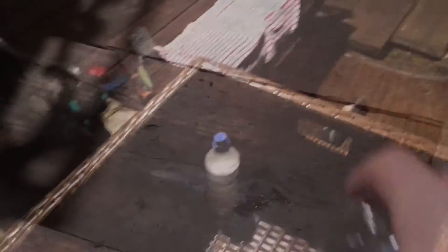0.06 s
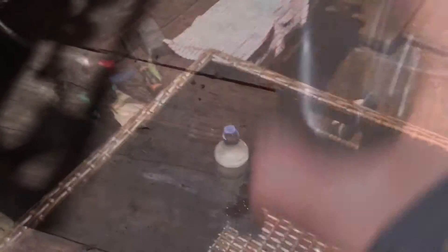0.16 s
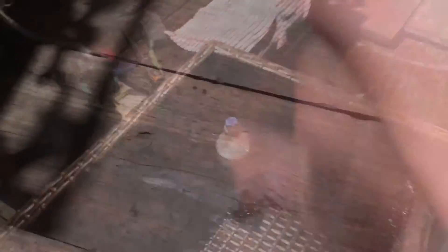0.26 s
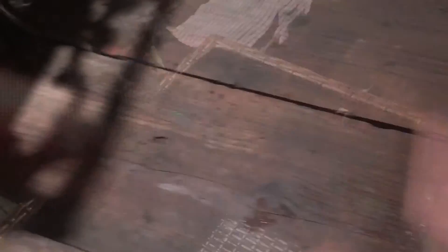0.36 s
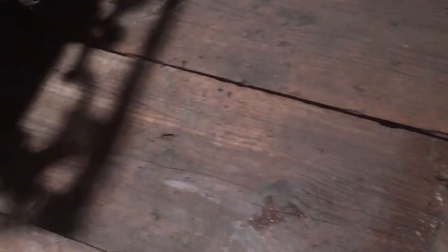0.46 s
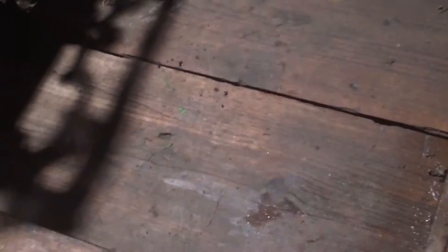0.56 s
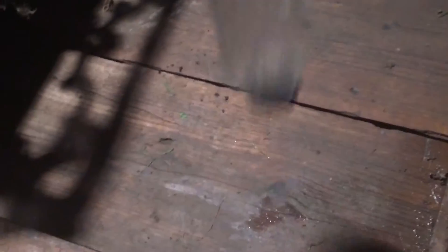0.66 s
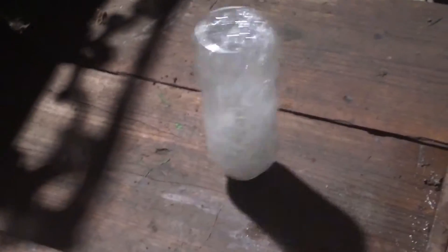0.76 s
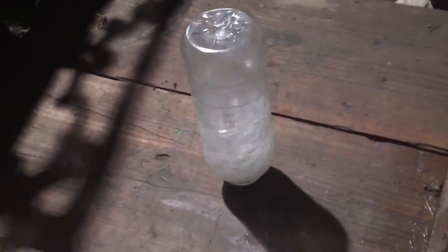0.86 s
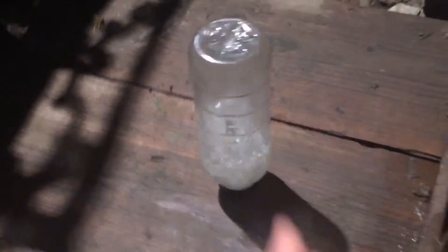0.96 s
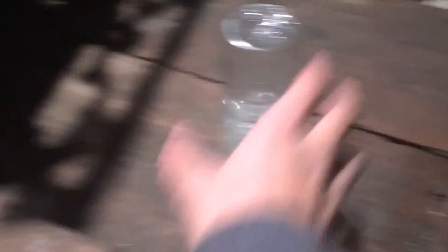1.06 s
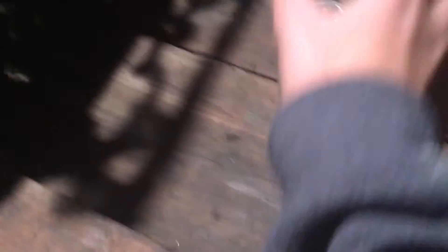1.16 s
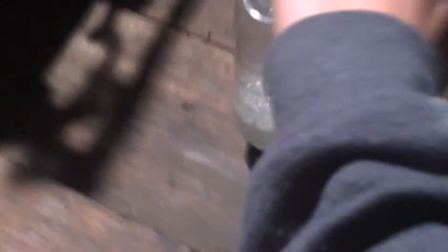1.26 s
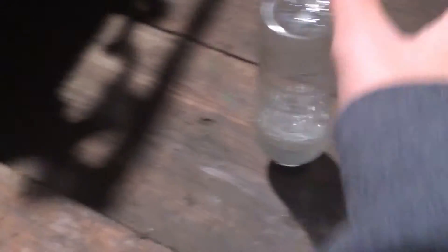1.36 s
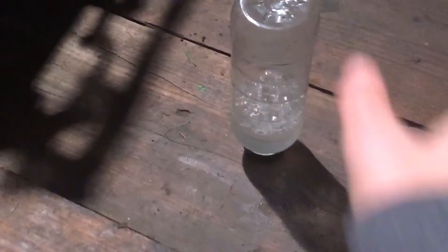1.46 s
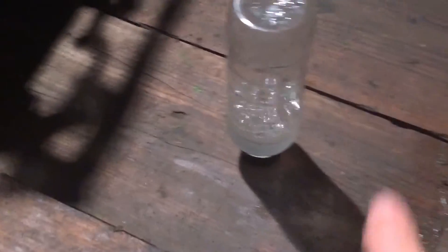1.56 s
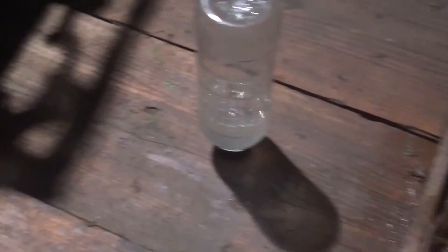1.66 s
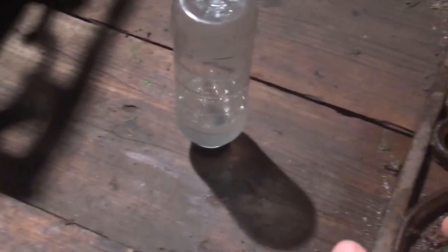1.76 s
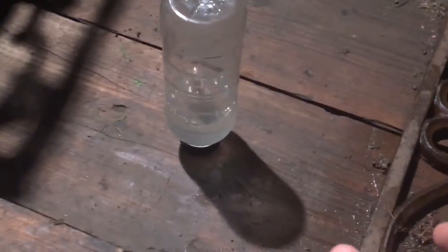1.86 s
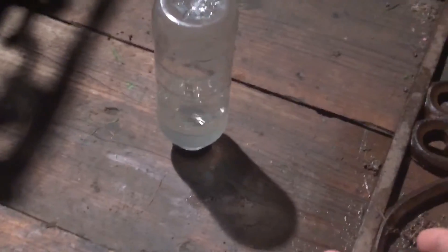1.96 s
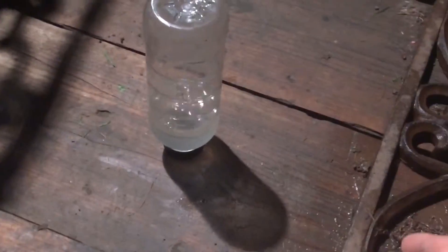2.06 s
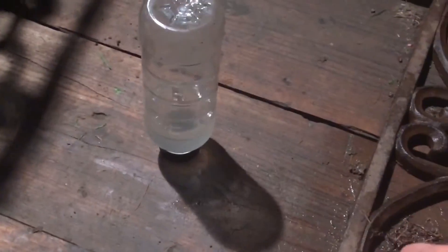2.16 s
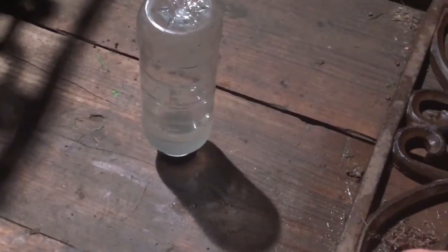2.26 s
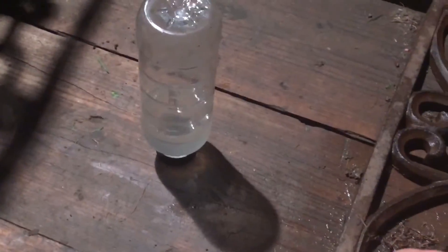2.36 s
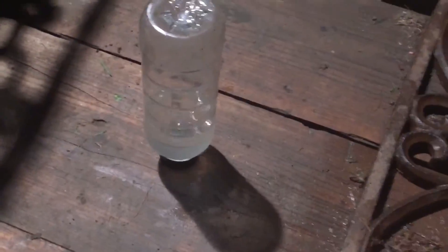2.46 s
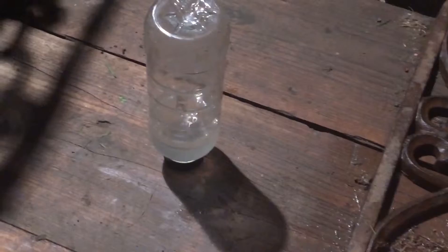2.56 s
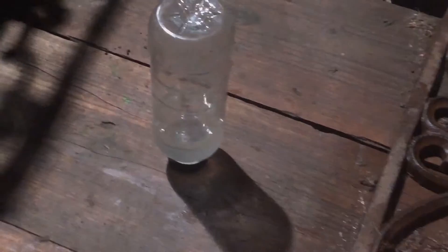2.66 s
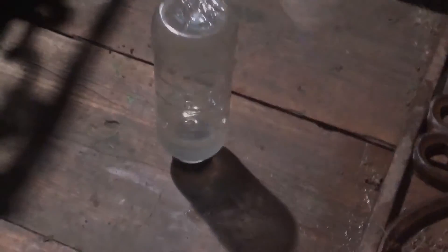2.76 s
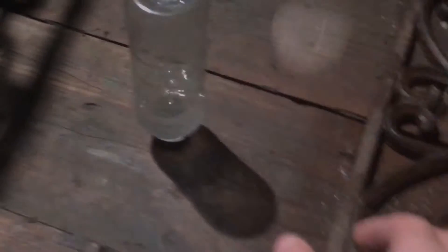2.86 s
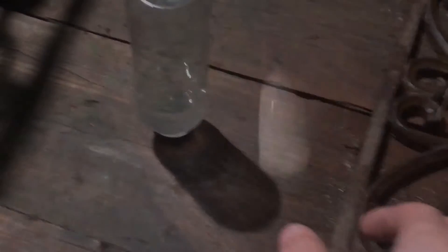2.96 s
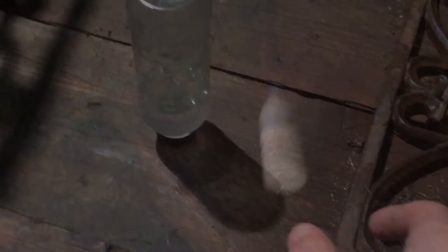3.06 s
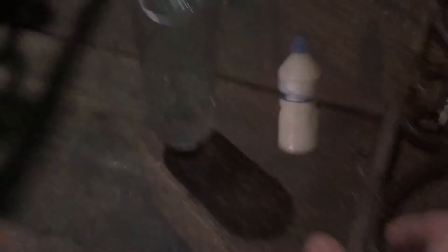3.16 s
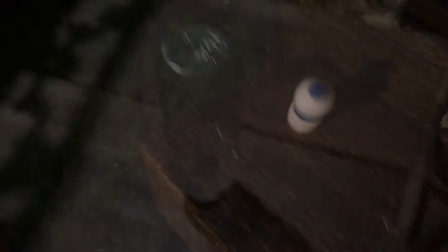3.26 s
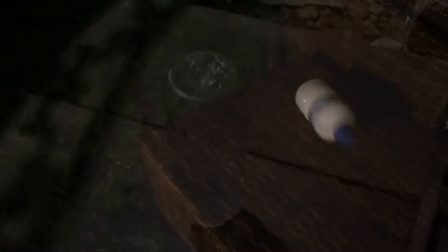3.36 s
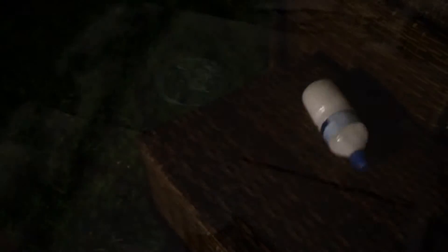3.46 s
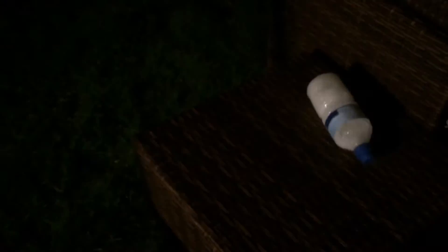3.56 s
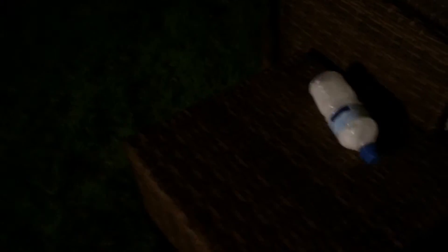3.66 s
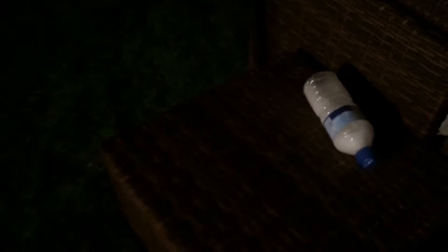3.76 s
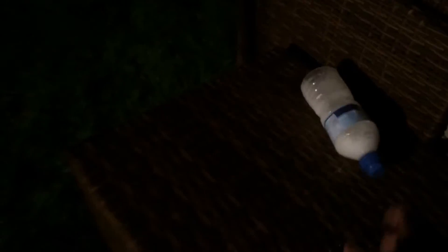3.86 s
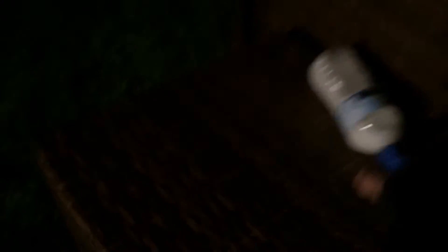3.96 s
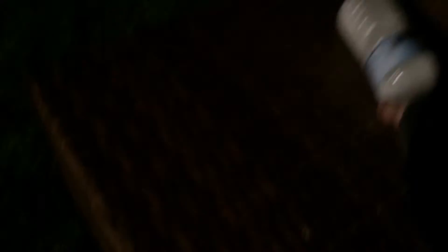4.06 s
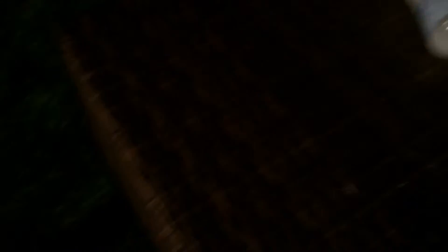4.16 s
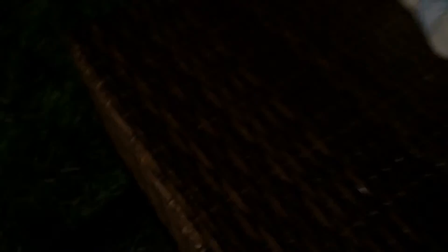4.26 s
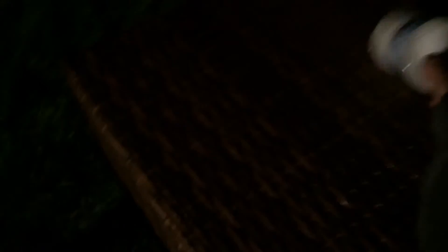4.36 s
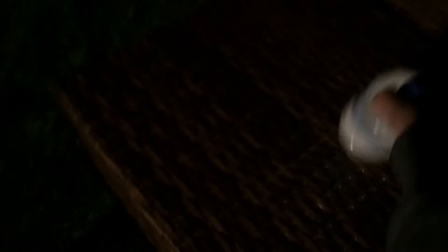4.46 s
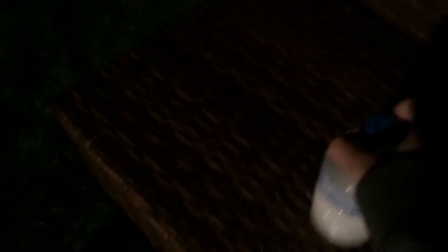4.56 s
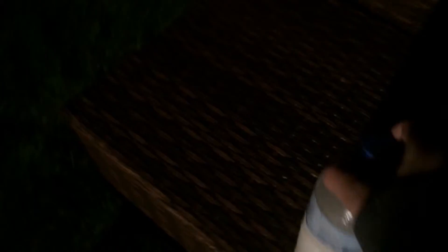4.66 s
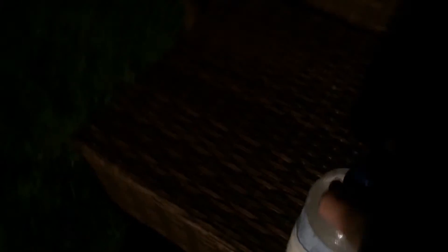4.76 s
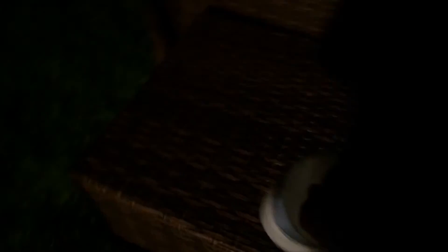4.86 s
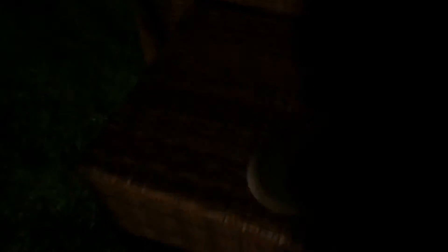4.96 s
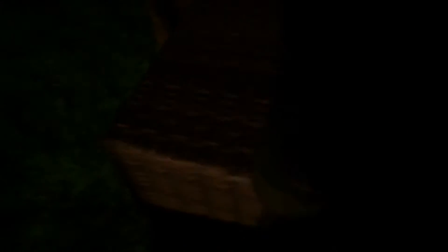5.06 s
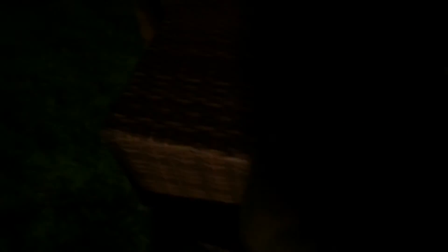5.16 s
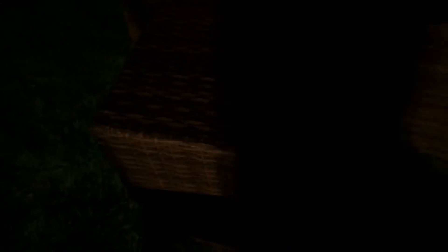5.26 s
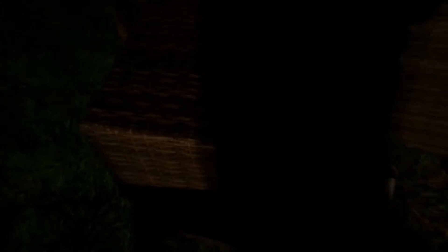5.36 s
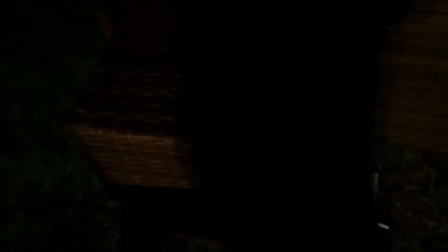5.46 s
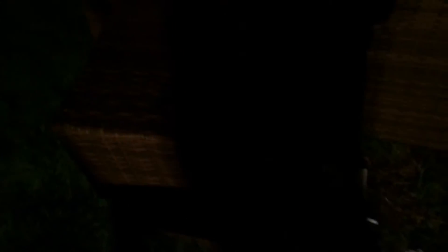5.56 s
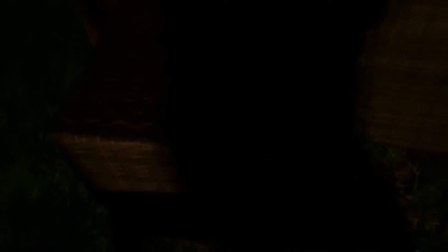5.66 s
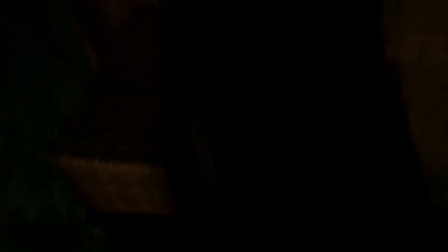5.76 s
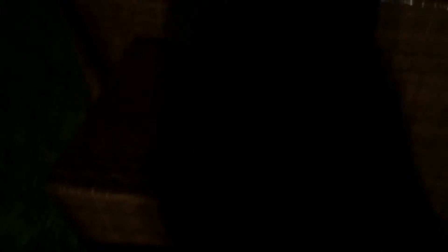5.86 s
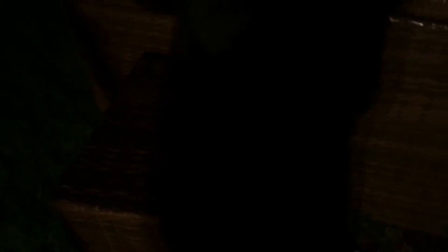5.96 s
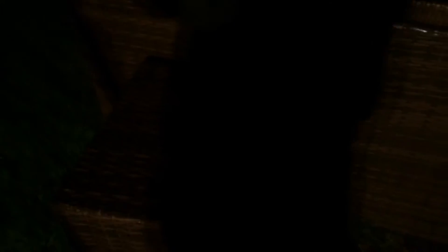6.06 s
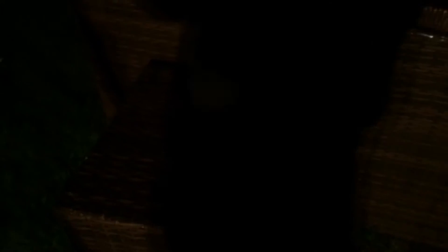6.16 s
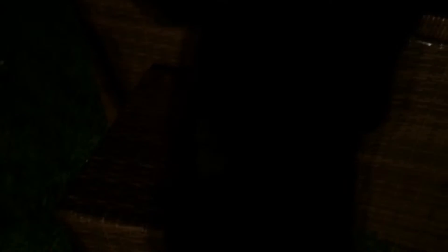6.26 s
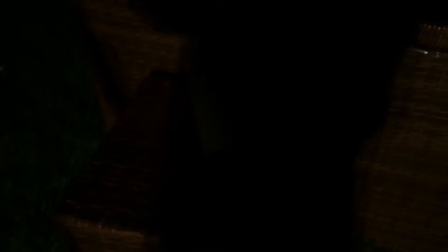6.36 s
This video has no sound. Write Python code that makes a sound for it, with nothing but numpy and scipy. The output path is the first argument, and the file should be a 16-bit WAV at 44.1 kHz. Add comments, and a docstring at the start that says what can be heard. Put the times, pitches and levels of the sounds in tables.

```python
"""Bottle flips on a night porch

Water sloshes in a spinning plastic bottle, which lands hard on a wooden deck: struck modes and cracks of noise.
A second bottle hits a wicker table, topples, is picked up and lands there again: the weave thuds and crackles.
Plastic clicks, bubbles ring as rising tones, a sleeve rustles as filtered noise, and feet shift on the boards.
Behind them are distant traffic made of noise and a faint wavering hum, all close to a phone."""
import sys
import numpy as np
from scipy import signal
from scipy.fft import rfft, irfft
from scipy.io import wavfile
from scipy.ndimage import uniform_filter1d, minimum_filter1d

SR = 44100
rng = np.random.default_rng(int(sys.argv[2]) if len(sys.argv) > 2 else 0)


def generate_wav(signal):
    """Clip the signal to [-1, 1] and save it as 16-bit WAV at the path in sys.argv[1]."""
    frames = np.transpose(np.atleast_2d(signal))
    scaled = np.clip(frames, -1, 1) * 32767
    pcm = np.round(scaled).astype(np.int16)
    wavfile.write(sys.argv[1], SR, pcm)


N = 282240  # samples, 6.4 s
AGE = np.arange(SR // 2) / SR  # seconds since a blow

# blows of the bottle on the deck, before the overall deck level:
# start_s, boards_db, contact_s (time constant of the push), crack_db (thin shell)
DECK_BLOWS = [(0.7978, -48, 0.00014, -37.5), (0.8102, -24, 0.00044, -41.5), (0.8215, -6, 0.000034, -8),
              (0.8238, -13.5, 0.00026, -16), (0.8387, -21, 0.00051, -23), (0.8442, -7, 0.00063, -13),
              (0.8474, -18, 0.0002, -19.5)]
# ringing of the boards and the standing bottle: pitch_hz, level_db, t60_s (time to fade by 60 dB)
DECK_MODES = [(234, -8, .16), (262, -11, .18), (313, -18, .18), (364, -13, .14), (436, -10.5, .13),
              (524, -14, .12), (706, -17, .09), (748, -20, .09), (834, -20, .07), (927, -14, .055),
              (1107, -19, .07), (1690, -15, .04), (1835, -2, .018), (2100, -13, .025), (2520, -9, .015),
              (2900, -13, .018)]
# tone of the cracking shell: pitch_hz, relative_level_db (per Hz)
SHELL = [(90, -31.5), (350, -9.5), (600, -8.5), (1140, -19.5), (1340, -18), (2130, -12), (2800, -15.5),
         (3400, -22), (9890, -33), (15500, -42.5)]
DECK_DB = 2.5  # overall deck level: the nearest sound


def deck_landing():
    """The rim touches, the base slams down and rocks; each blow rings the boards and cracks the thin shell."""
    blows, cracks = np.zeros(N), np.zeros(N)
    for start_s, boards_db, contact_s, crack_db in DECK_BLOWS:
        push = fade(contact_s * np.log(1000))  # a longer contact is duller
        add(blows, start_s, undb(boards_db) * push / push.sum())
        crack = hiss(0.014) + undb(-9.0) * hiss(0.087)
        add(cracks, start_s, undb(crack_db) * crack)
    boards = sum(undb(db) * ring(hz, t60) for hz, db, t60 in DECK_MODES)
    knock = signal.fftconvolve(blows, boards)[:N]
    knock = band(knock, 140, 7500, order=3)  # open planks radiate little deep bass
    landing = knock + colour(cracks, SHELL)
    return undb(DECK_DB) * porch(landing, wet_db=-30.5, t60=0.38, top_hz=2507)


# weight of a bottle sinking into the wicker: start_s, level_db, lowest_pitch_hz, base_t60_s
WICKER_THUDS = [(3.0890, -16, 140, 0.2), (3.1040, -34, 168, 0.16), (3.1120, -17.5, 61, 0.2),
                (3.5085, -22.5, 114, 0.036), (6.0830, -30.5, 146.3, 0.1), (6.3365, -22.5, 137, 0.073),
                (6.3480, -11.5, 186, 0.028), (6.3560, -2.5, 79, 0.097), (6.3640, -2.5, 123, 0.063)]
# table under that weight: pitch_multiple (of the lowest), level_db, t60_share (of the base)
WICKER_MODES = [(1.002, 3.5, 0.63), (1.36, -2.5, 0.91), (1.952, -8, 0.63)]
# plastic slapping the strands: start_s, crackle_db, crackle_t60_s, snap_extra_db (above crackle_db)
WICKER_SLAPS = [(3.0871, -19.5, 0.017, -9), (3.0924, -22, 0.13, -1), (3.1065, -25.5, 0.031, -1),
                (3.1118, -17, 0.091, 0), (3.1211, -29, 0.046, 6.5), (3.3367, -43, 0.044, -5),
                (6.0805, -39.5, 0.093, 6), (6.332, -27, 0.12, -8), (6.353, -20.5, 0.072, -26),
                (6.357, -24, 0.16, 5.5), (6.3634, -18, 0.05, 1), (6.374, -19, 0.045, -1.5)]
# thin bottle under a slap: pitch_hz (before the dent shifts it), level_db, t60_s
BOTTLE_MODES = [(1380, -10, 0.017), (1820, -8.5, 0.022), (2885, -1, 0.019), (4610, -12, 0.015)]
# tone of the woven strands: pitch_hz, relative_level_db (per Hz)
WEAVE = [(200, -6), (420, -4.5), (620, -2.5), (820, -10), (1150, -8), (2790, -8.5), (3900, -14.5),
         (5200, -14), (13500, -18.5), (15500, -30)]


def wicker_landings():
    """Each slap snaps and rings the bottle; strands slip in a dense crackle while the table takes the weight."""
    slips, snaps, bottle = np.zeros(N), np.zeros(N), np.zeros(N)
    for start_s, crackle_db, t60, snap_extra_db in WICKER_SLAPS:
        snap_db = crackle_db + snap_extra_db
        add(slips, start_s, undb(crackle_db) * hiss(t60))
        add(snaps, start_s, undb([snap_db]))  # a single-sample click
        dent = np.exp(0.067 * rng.standard_normal())  # the dent shifts the pitch
        shell = sum(undb(db) * ring(hz * dent, life) for hz, db, life in BOTTLE_MODES)
        add(bottle, start_s, undb(snap_db) * shell)
    crackle = slips * unit(undb(3.3 * walk(1800)))
    strands = colour(crackle + 7 * snaps, WEAVE)
    table = thuds(WICKER_THUDS, WICKER_MODES, rise_t60=0.0092)
    return porch(strands + bottle + table, wet_db=-24.5, t60=0.25, top_hz=4100)


# bottle rolling and dragging over the strands: start_s, length_s, end_level_db, growth_db (on the way)
ROLLS = [(3.337, 0.068, -44, 1.5), (3.494, .064, -48, -5), (3.599, 0.071, -56.5, 0.5),
         (4.303, .19, -54.5, 6.5)]
ROLL_GRAINS_PER_S, ROLL_SCATTER_DB = 600, 3.8


def rolling():
    """The ribs of the bottle catch strand after strand: a rough rattle of short, uneven scrapes."""
    unevenness = unit(undb(ROLL_SCATTER_DB * walk(ROLL_GRAINS_PER_S)))
    grains = rng.standard_normal(N) * unevenness
    level = sum(stroke(*row, attack_s=0.001, release_s=0.014) for row in ROLLS)
    return colour(grains * level, WEAVE)


# full bottle bumping as it is gripped and lifted: start_s, level_db, lowest_pitch_hz, base_t60_s
KNOCKS = [(4.4335, -37, 162, 0.059), (4.4505, -41, 140, 0.19), (4.4665, -38.5, 212.6, 0.13),
          (5.0485, -32, 178, 0.037), (5.0542, -30.5, 185, 0.14)]
# bottle in the hand: pitch_multiple (of the lowest), level_db, t60_share (of the base)
KNOCK_MODES = [(1, 5, 0.84), (2, -6, 0.85), (4.43, -11, 0.32), (7.6, -28, 0.38)]
# clicks and crinkles of the plastic: start_s, level_db, centre_hz
CRINKLES = [(0.4342, -38.5, 8200), (0.536, -40, 8550), (1.0482, -54, 6650), (2.7246, -55.5, 7740),
            (2.82, -54.5, 6360), (3.3707, -20, 8200), (3.3887, -35, 5430), (3.4032, -33, 6500),
            (3.5044, -32, 8400), (3.5302, -24.5, 8260), (4.2149, -30.5, 700), (4.2190, -21.5, 3500),
            (4.387, -40, 3330), (4.4815, -42, 2590), (5.0542, -33, 1100), (5.068, -42.5, 4600),
            (5.1580, -41, 6700), (5.187, -51.5, 6440), (5.2628, -55, 9540), (5.4366, -44, 6900),
            (5.9912, -54.5, 6560)]
CRINKLE_T60_S = 0.0017  # fade time of a buckle at 0 dB
CRINKLE_HALVING_DB = 8.5  # this much harder a buckle fades in half the time


def handling():
    """The thin plastic buckles with a sharp click and a brief ring; the filled body knocks and scuffs."""
    out = thuds(KNOCKS, KNOCK_MODES, rise_t60=0.0044) + undb(3.5) * scuffs(KNOCKS)
    for start_s, db, centre_hz in CRINKLES:
        buckle = hiss(CRINKLE_T60_S * 2 ** (-db / CRINKLE_HALVING_DB))
        buckle[0] = 8  # the snap that starts it
        click = band(buckle, centre_hz / 2.05, centre_hz * 1.34, order=1)
        add(out, start_s, undb(db) * (click + undb(-8.5) * ring(centre_hz, 0.014)))
    return porch(out, wet_db=-28.0, t60=0.3, top_hz=4900)


# water thrown about in the bottle: start_s, level_db, length_s (a third of its t60), centre_hz
SPLASHES = [(0.547, -24, 0.016, 4250), (0.5734, -30.5, 0.039, 5500), (0.854, -17.5, 0.088, 380),
            (0.878, -38, 0.13, 2100)]
# single bubbles: start_s, level_db, starting_pitch_hz, cycles (t60 counted in cycles of that pitch)
BUBBLES = [(.5490, -27.5, 526, 36), (0.598, -20, 6700, 25), (0.603, -21.5, 1786, 32),
           (0.6738, -23, 3190, 12), (2.581, -38.5, 1660, 62), (6.191, -42, 502, 114)]
# swarms of bubbles in churned water: start_s, length_s, first_level_db (for the largest size),
# lowest_hz, highest_hz
GURGLES = [(0.56, 0.11, -33, 2900, 9000), (0.875, 0.12, -25, 140, 536), (0.868, .085, -32, 1590, 2960)]
GURGLE_CYCLES, GURGLE_FALL_DB = 16, -8  # life of a bubble; level change from first to last


def slosh():
    """Water breaks into spray and traps bubbles: single ones, and swarms that weaken towards their end."""
    spray, bubbles = np.zeros(N), np.zeros(N)
    for start_s, db, length_s, centre_hz in SPLASHES:
        splash = band(hiss(3 * length_s), centre_hz / 1.4, centre_hz * 1.3, order=1)
        add(spray, start_s, undb(db) * splash * (1 - fade(0.00825)))
    for start_s, db, hz, cycles in BUBBLES:
        add(bubbles, start_s, undb(db) * bubble(hz, cycles))
    for start_s, length_s, first_db, low_hz, high_hz in GURGLES:
        for when, pitch, size in rng.random(size=(30, 3)):  # 30 bubbles a swarm, each value 0 to 1
            hz = low_hz * (high_hz / low_hz) ** pitch
            gain = size * undb(first_db + GURGLE_FALL_DB * when)
            add(bubbles, start_s + when * length_s, gain * bubble(hz, GURGLE_CYCLES))
    water = spray * undb(3.6 * walk(900)) + bubbles
    return porch(water, wet_db=-14.5, t60=0.053, top_hz=6945)


def bubble(hz, cycles):
    """A trapped bubble rises slightly in pitch as it rings."""
    life = cycles / hz
    rising = 1 + 0.038 * AGE / life
    return np.sin(2 * np.pi * hz * AGE * rising) * fade(life) * (1 - fade(life / 2))


# feet and knees on the deck: start_s, level_db, lowest_pitch_hz (of the boards), base_t60_s
STEPS = [(0.558, -14.5, 59.4, 0.049), (2.845, -23, 161, 0.035), (4.47, -39, 68, 0.2),
         (5.569, -34.5, 62.4, 0.14), (5.949, -24, 155.3, 0.041)]


def feet():
    """Each footfall bends the boards and grinds a little grit under the sole."""
    # modes: pitch multiple, dB, share of the t60
    boards = thuds(STEPS, [(1, -0.5, 0.85), (2.05, -8, 0.83)], rise_t60=0.051)
    return porch(boards + undb(-5.5) * scuffs(STEPS), wet_db=-12.0, t60=0.25, top_hz=2953)


# strokes of the arm in its sleeve: start_s, length_s, end_level_db, growth_db (during the stroke)
STROKES = [(0.244, 0.15, -48, 19.5), (0.455, 0.21, -64.5, -4.5), (1.096, 0.33, -69, -1.5),
           (1.453, 0.24, -64.5, 12), (2.627, 0.35, -80, -9), (3.12, 0.45, -60, 9), (3.92, 0.31, -65, 0.5),
           (4.256, 0.25, -61.5, -1.5), (4.506, 0.43, -71, -4.5), (4.974, 0.18, -58, 6.5),
           (5.176, 0.25, -53, 17), (5.886, 0.16, -73, -7)]
STROKE_ATTACK_S, STROKE_RELEASE_S = 0.02, 0.025  # time constants of cloth taking up and losing speed
REACH_S, REACH_WIDTH_S, REACH_DB = 4.014, 0.16, -63  # long reach for the fallen bottle
# tone of the cloth: pitch_hz, relative_level_db (per Hz)
CLOTH = [(1300, -23.5), (2400, -5.5), (5200, -5.5), (12000, -7.5), (15500, -12.5)]


def sleeve():
    """Fibres catch and let go as the arm moves, a few with a tick; the long reach gives a narrower swish."""
    ticks = (rng.random(N) < 40 / SR) * rng.standard_normal(N)  # about 40 a second
    catching = unit(undb(2.5 * walk(1000) + walk(37)))
    fibres = rng.standard_normal(N) * catching + undb(17) * ticks
    swish = unit(band(rng.standard_normal(N), 1870, 4500))
    swish = swish * undb(REACH_DB) * swell(REACH_S, REACH_WIDTH_S)
    return colour(fibres, CLOTH) * sum(stroke(*row) for row in STROKES) + swish


# far cars going by: nearest_s, level_db (there), half_power_s (time until the power has halved)
CARS = [(0.271, -57, 0.2), (3.052, -56, 0.34), (5.7, -63, 1)]
# tone of the far tyres: pitch_hz, relative_level_db (per Hz)
ROAR = [(250, -35.5), (420, -21), (860, -7.5), (1040, -5.5), (1190, -8.5), (1500, -12.5), (2900, -27.5),
        (15500, -56.5)]
# tone of the low rumble: pitch_hz, relative_level_db (per Hz)
RUMBLE = [(20, 3), (65, 1.5), (190, -2), (320, -8.5), (600, -15), (1200, -61.5)]
TOWN_DB, RUMBLE_OVER_ROAR_DB = -62.5, 4.5  # steady traffic behind the cars; rumble against the roar
# swells of a far engine's hum: loudest_s, level_db, spread_s (of the bell shape)
HUM_SWELLS = [(3.419, -49, 0.33), (4.62, -58.5, 0.3), (5.72, -53, 0.24)]
HUM_HZ = 145  # the pitch it wavers around
HISS_DB = -73.5  # steady treble hiss of the microphone


def night():
    """Far tyres and low rumble grow as each car nears; an engine hum swells and wavers; a faint hiss stays."""
    t = np.arange(N) / SR
    cars = sum(undb(db) ** 2 / (1 + ((t - s) / half_s) ** 2) for s, db, half_s in CARS)
    traffic = np.sqrt(undb(TOWN_DB) ** 2 + cars)  # powers add up
    roar = colour(rng.standard_normal(N), ROAR) * undb(0.5 * walk(36))
    rumble = colour(rng.standard_normal(N), RUMBLE) * undb(RUMBLE_OVER_ROAR_DB + walk(3.5))
    phase = 2 * np.pi * np.cumsum(HUM_HZ * (1 + 0.0093 * walk(5.895))) / SR
    hum_level = sum(undb(db) * swell(s, spread_s) for s, db, spread_s in HUM_SWELLS)
    hum = np.sqrt(2) * np.sin(phase) * undb(2.0 * walk(11.0)) * hum_level
    steady_hiss = undb(HISS_DB) * colour(rng.standard_normal(N), CLOTH)
    return traffic * (roar + rumble) + hum + steady_hiss


def thuds(rows, modes, rise_t60):
    """Soft heavy pushes on a few low modes, whose pitch depends on the spot and the load."""
    out = np.zeros(N)
    for start_s, db, lowest_hz, t60 in rows:
        body = sum(undb(mode_db) * ring(lowest_hz * multiple, t60 * share)
                   for multiple, mode_db, share in modes)
        add(out, start_s, undb(db) * body * (1 - fade(rise_t60)))
    return out


def scuffs(rows):
    """Surfaces brush and grind just before and after each bump."""
    grit = np.zeros(N)
    for start_s, db, _, t60 in rows:
        add(grit, start_s - 0.012, undb(db) * hiss(1.6 * t60) * (1 - fade(0.04)))
    return band(grit * unit(undb(4.5 * walk(250))), 300, 1210)


def stroke(s, length, db, growth_db, attack_s=STROKE_ATTACK_S, release_s=STROKE_RELEASE_S):
    """Level of one movement: it sets in, grows or weakens on the way, and stops."""
    age = np.maximum(np.arange(N) / SR - s, 0)
    onset = 1 - np.exp(-age / attack_s)
    ending = np.exp(-np.maximum(age - length, 0) / release_s)
    return onset * ending * undb(db + growth_db * (np.minimum(age / length, 1) - 1))


def swell(s, width_s):
    """Bell-shaped rise and fall around time s."""
    return np.exp(-0.5 * ((np.arange(N) / SR - s) / width_s) ** 2)


def porch(x, wet_db, t60, top_hz):
    """Scattered reflections from the boards and the house wall, as a fading tail of noise."""
    tail = band(hiss(t60) * (1 - fade(0.051)), 100, top_hz, order=1)
    return x + undb(wet_db) * signal.fftconvolve(x, tail / np.linalg.norm(tail))[:N]


def undb(db):
    """Decibels to gain."""
    return 10 ** (np.asarray(db) / 20)


def unit(x):
    """Scale to rms 1."""
    return x / np.sqrt(np.mean(x ** 2))


def add(out, s, sound):
    """Mix a sound in at time s."""
    i = int(s * SR)
    out[i:i + len(sound)] += sound[:N - i]


def fade(t60):
    """Exponential decay after a blow, down 60 dB after t60 seconds."""
    return np.exp(-np.log(1000) * AGE / t60)


def ring(hz, t60):
    """One struck mode: a fading pure tone."""
    return np.sin(2 * np.pi * hz * AGE) * fade(t60)


def hiss(t60):
    """Noise that dies away."""
    return rng.standard_normal(len(AGE)) * fade(t60)


def band(x, lo_hz, hi_hz, order=2):
    """Keep the pitches between two limits."""
    limits = [lo_hz, min(hi_hz, SR / 2 - 1000)]
    return signal.sosfilt(signal.butter(order, limits, "band", fs=SR, output="sos"), x)


def colour(x, points, size=4096):
    """Give a sound a tone through (Hz, dB) points: a filter of unit energy that never rings early."""
    hz, db = np.transpose(points)
    log_hz = np.log(np.fft.rfftfreq(size, 1 / SR) + 1)
    log_gain = np.log(undb(np.interp(log_hz, np.log(hz), db)))
    cepstrum = irfft(log_gain)[:size // 2]
    cepstrum[1:] *= 2  # folding it forward makes the filter minimum phase
    response = irfft(np.exp(rfft(cepstrum, size)))
    return signal.fftconvolve(x, response / np.linalg.norm(response))[:len(x)]


def walk(rate):
    """Smooth random wandering of rms 1, with about `rate` new values a second."""
    k = max(int(SR / rate), 1)
    held = rng.standard_normal(N)[np.arange(N) // k]
    return unit(uniform_filter1d(uniform_filter1d(held, k), k))


LIMIT_DB = -5.5  # ceiling for the short-term rms
LIMIT_WINDOW_S, LIMIT_HOLD_S, LIMIT_RELEASE_S = 0.002, 0.27, 0.03  # release is a time constant


def limiter(x):
    """A very loud blow turns the gain down at once; it stays down a moment, then recovers."""
    power = uniform_filter1d(x ** 2, max(int(LIMIT_WINDOW_S * SR), 1))
    wanted = undb(LIMIT_DB) / np.sqrt(np.maximum(power, undb(LIMIT_DB) ** 2))
    half = int(LIMIT_HOLD_S * SR / 2)
    cut = 1 - minimum_filter1d(wanted, 2 * half + 1, origin=half, mode="nearest")
    keep = np.exp(-1 / (LIMIT_RELEASE_S * SR))
    recovering = signal.lfilter([1 - keep], [1, -keep], cut)
    return x * (1 - np.maximum(cut, recovering))


def scene():
    """All sources at one microphone."""
    bottles = deck_landing() + wicker_landings() + rolling() + handling()
    return (bottles + feet() + slosh() + sleeve() + night())[None]


TOP_HZ = 15400  # the phone passes almost nothing above this


def record(dry):
    """The phone thins the deepest bass, limits, clips at full scale and cuts the top."""
    thin = signal.sosfilt(signal.butter(4, 43, "high", fs=SR, output="sos"), dry)
    clipped = np.clip(limiter(thin), -1, 1)
    return signal.sosfilt(signal.ellip(10, 0.2, 80, TOP_HZ, fs=SR, output="sos"), clipped)


dry = scene()
out = record(dry)
generate_wav(out)
```